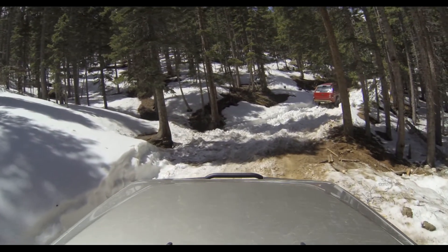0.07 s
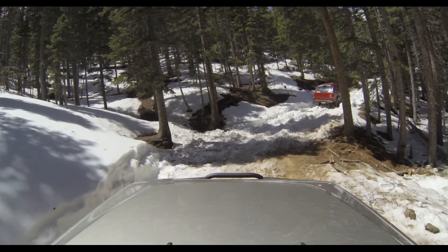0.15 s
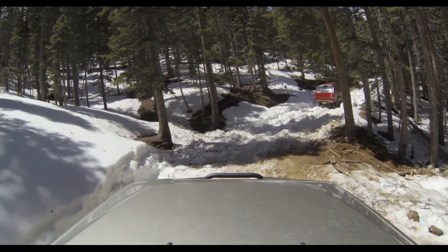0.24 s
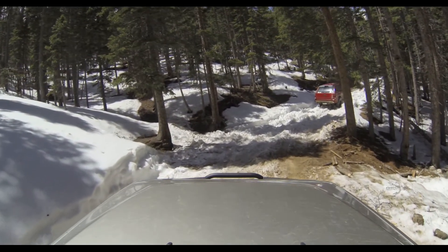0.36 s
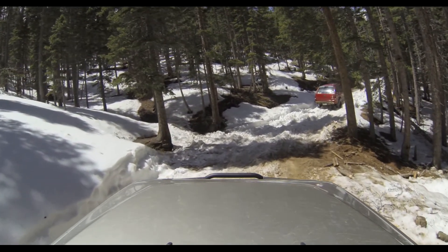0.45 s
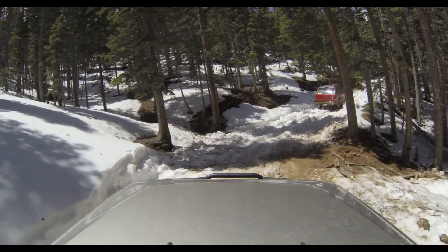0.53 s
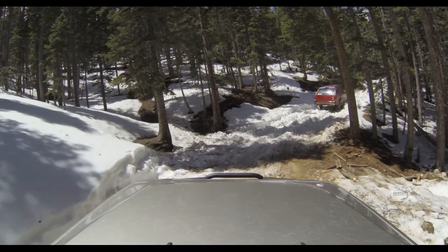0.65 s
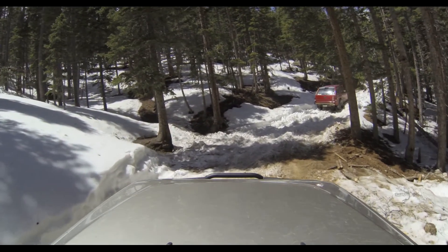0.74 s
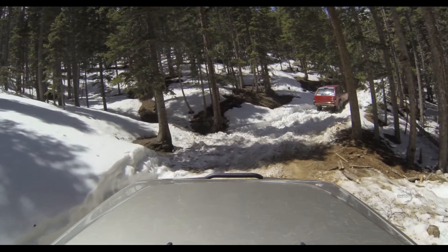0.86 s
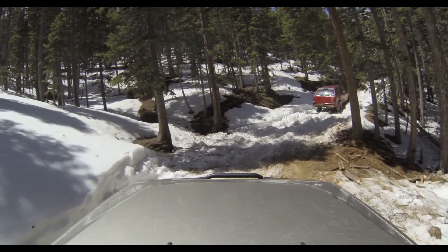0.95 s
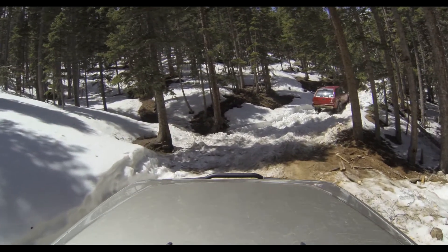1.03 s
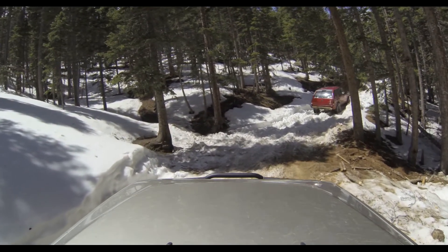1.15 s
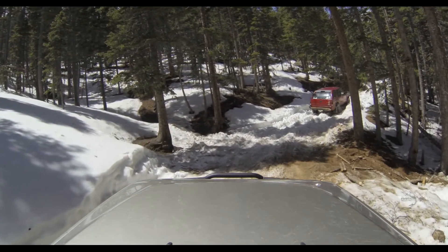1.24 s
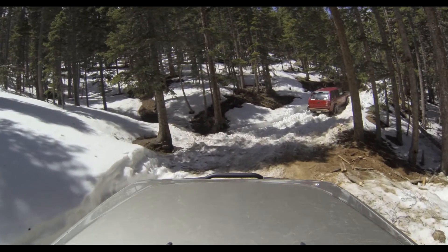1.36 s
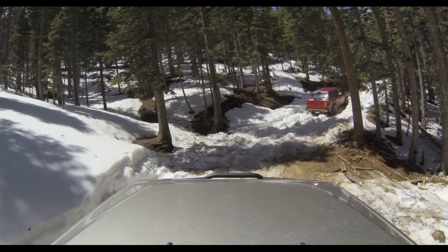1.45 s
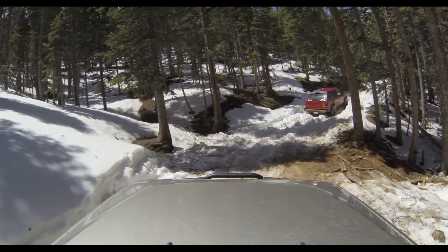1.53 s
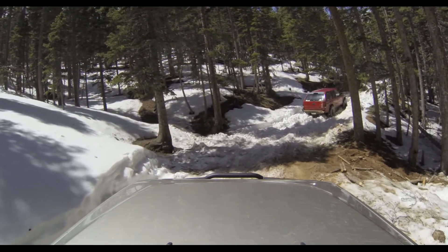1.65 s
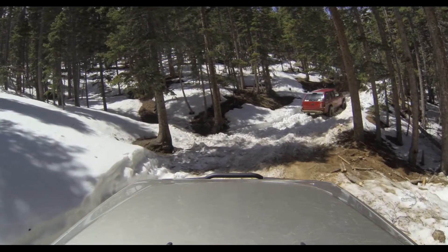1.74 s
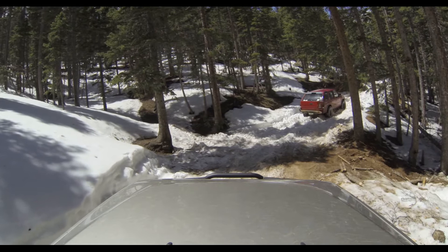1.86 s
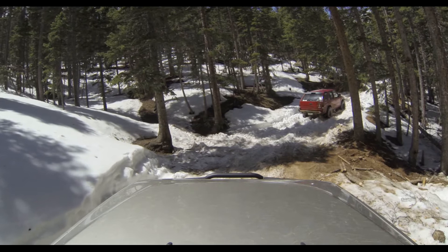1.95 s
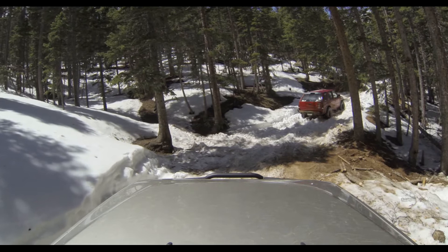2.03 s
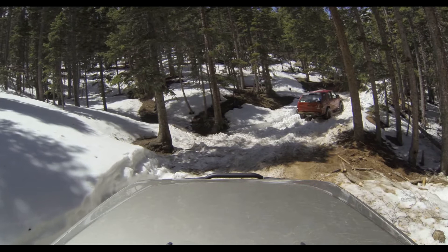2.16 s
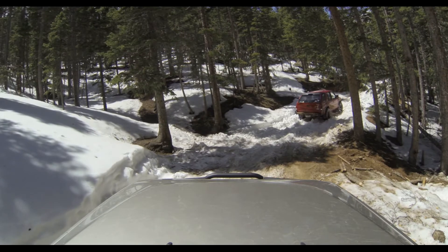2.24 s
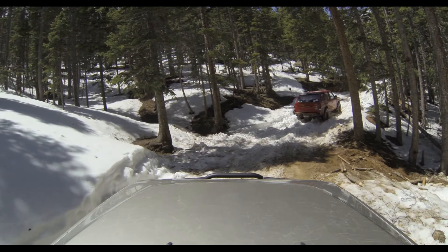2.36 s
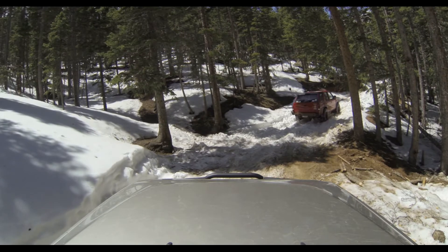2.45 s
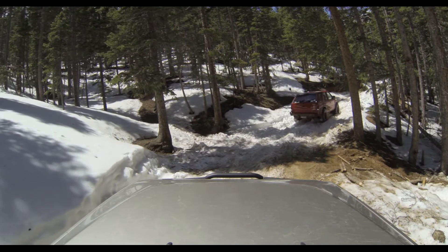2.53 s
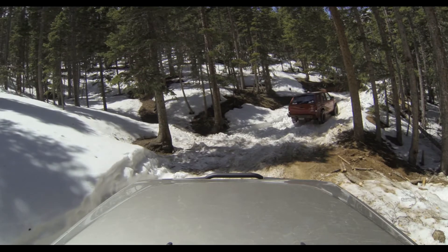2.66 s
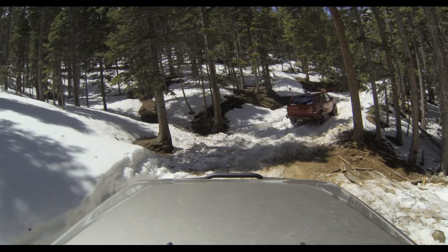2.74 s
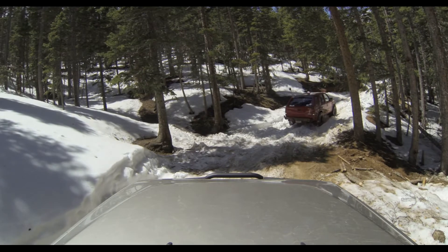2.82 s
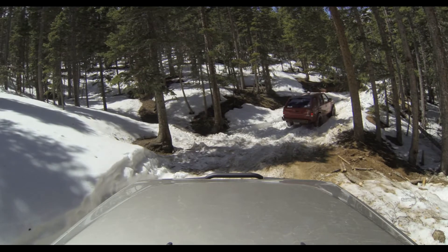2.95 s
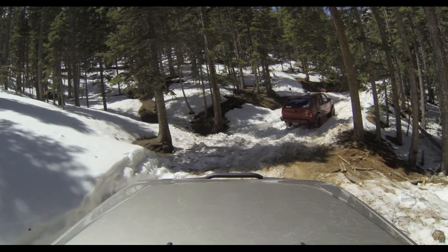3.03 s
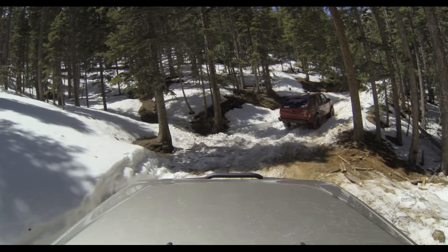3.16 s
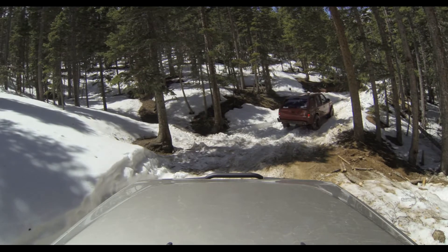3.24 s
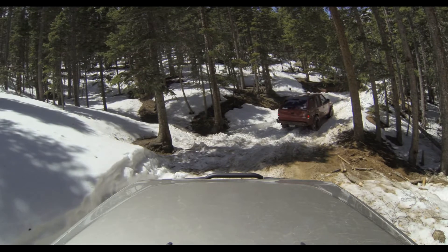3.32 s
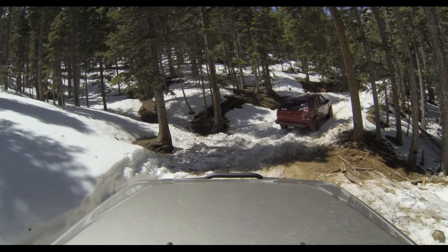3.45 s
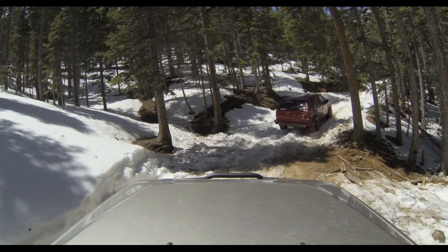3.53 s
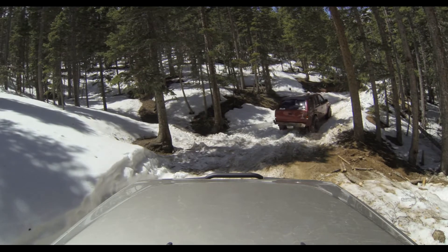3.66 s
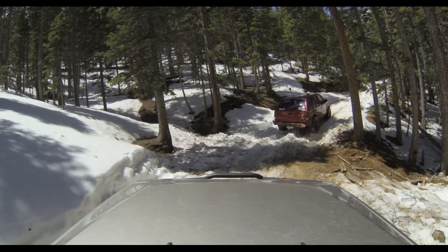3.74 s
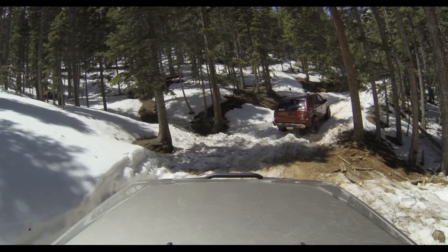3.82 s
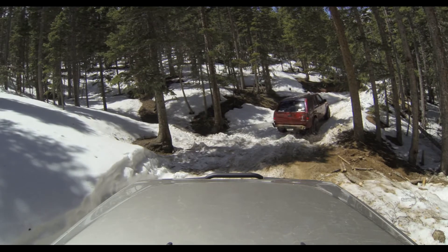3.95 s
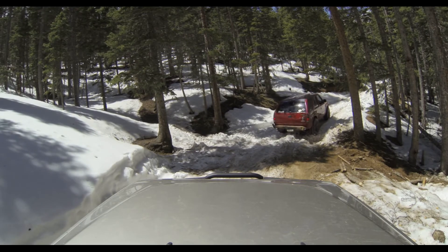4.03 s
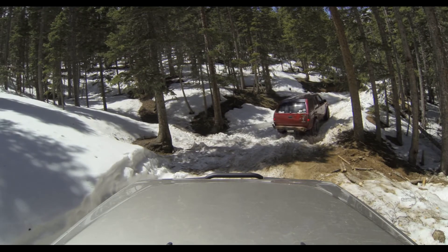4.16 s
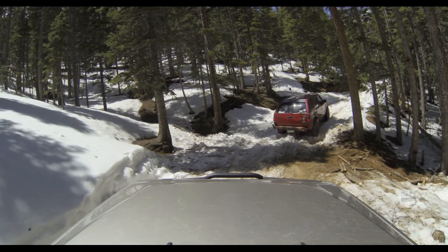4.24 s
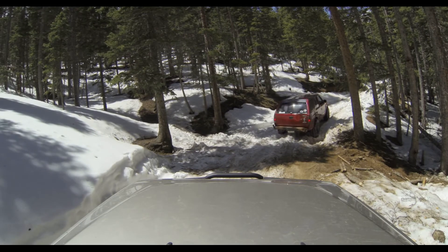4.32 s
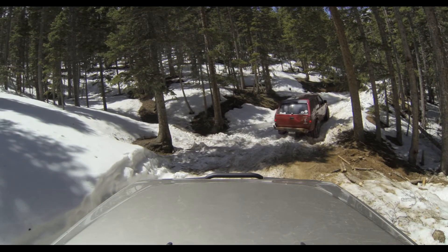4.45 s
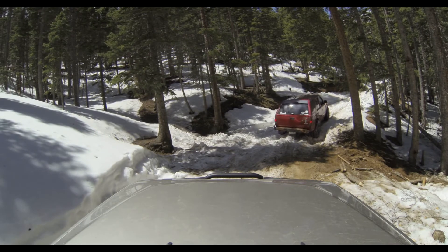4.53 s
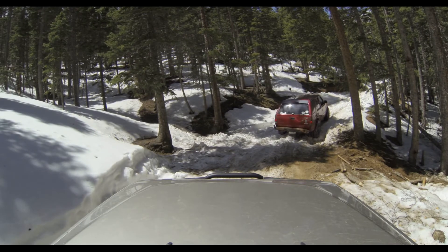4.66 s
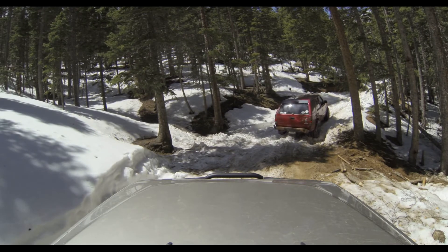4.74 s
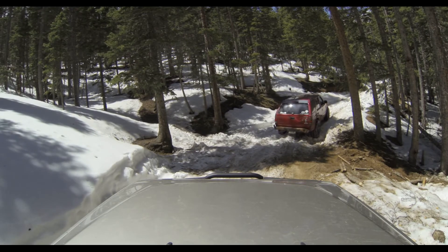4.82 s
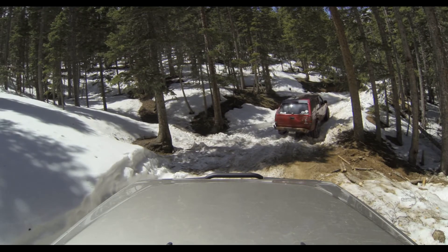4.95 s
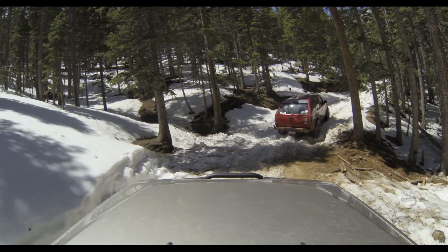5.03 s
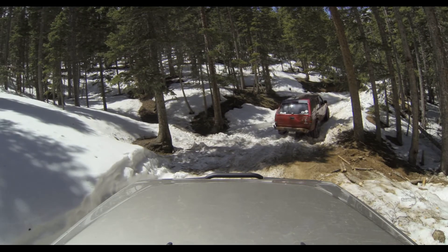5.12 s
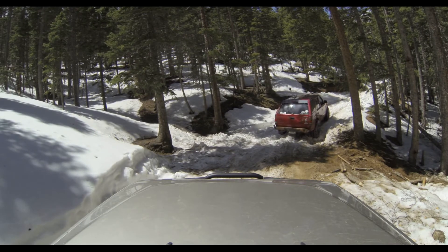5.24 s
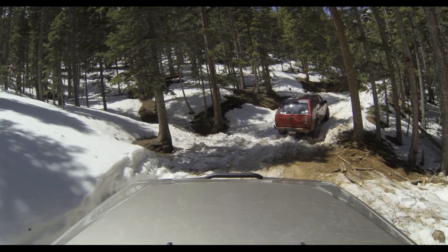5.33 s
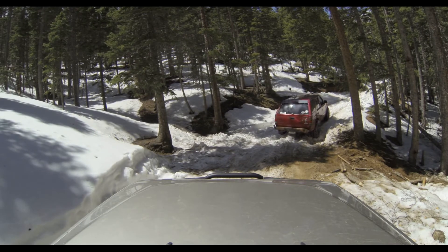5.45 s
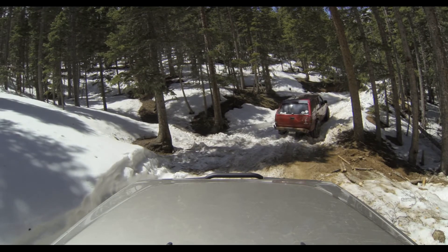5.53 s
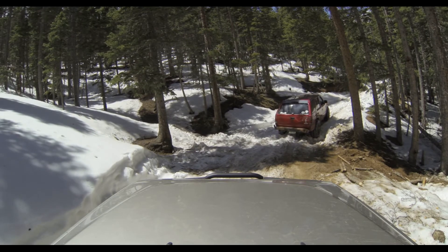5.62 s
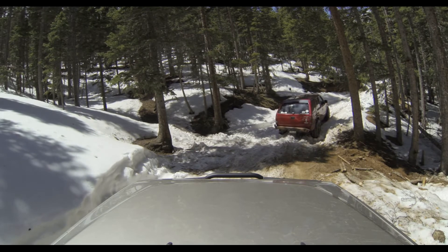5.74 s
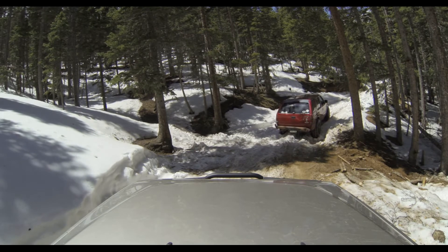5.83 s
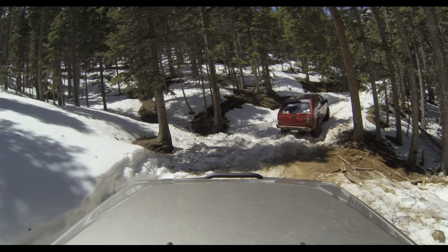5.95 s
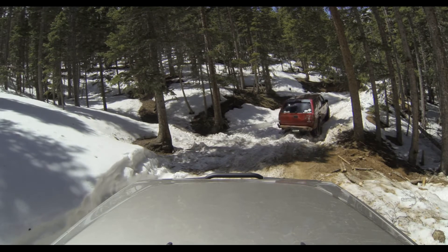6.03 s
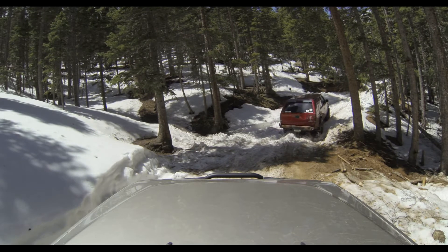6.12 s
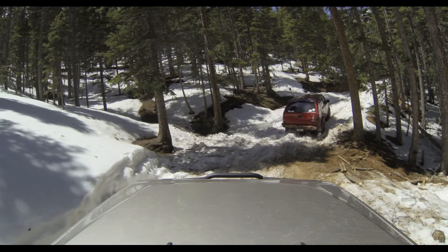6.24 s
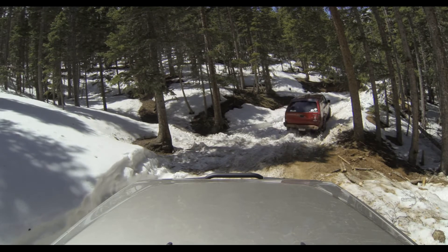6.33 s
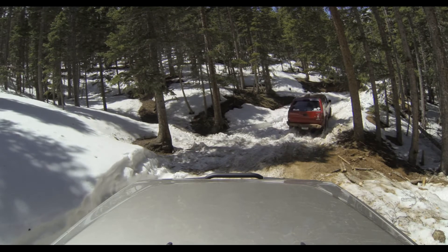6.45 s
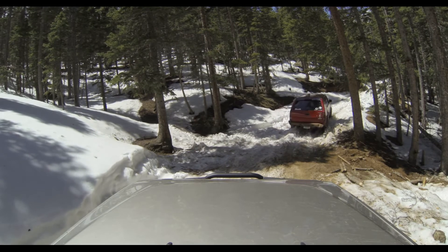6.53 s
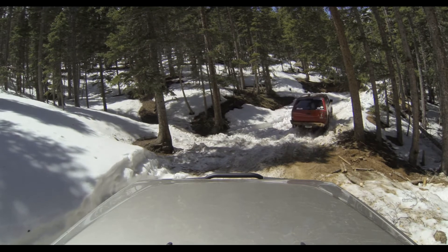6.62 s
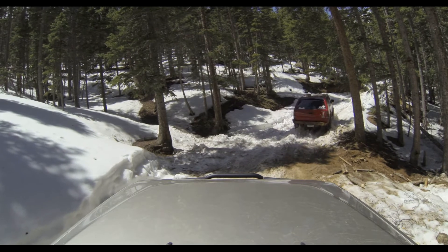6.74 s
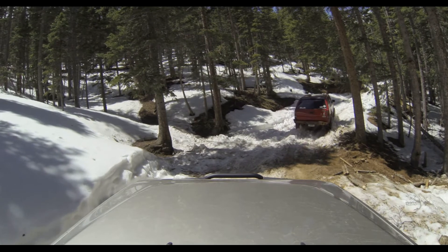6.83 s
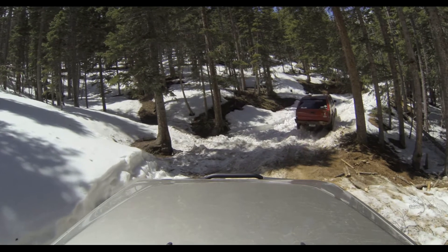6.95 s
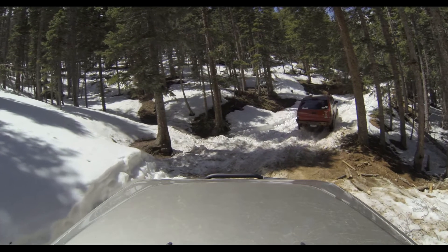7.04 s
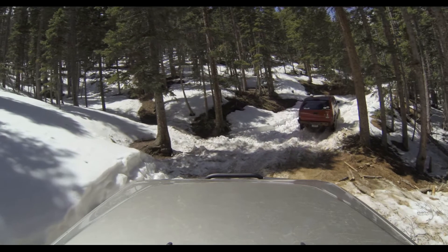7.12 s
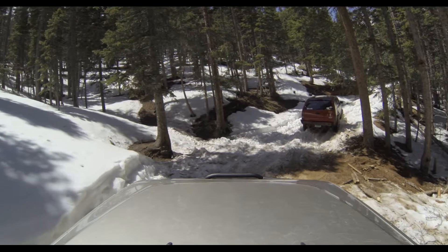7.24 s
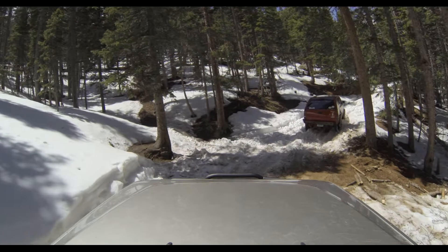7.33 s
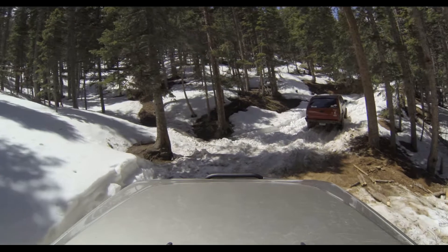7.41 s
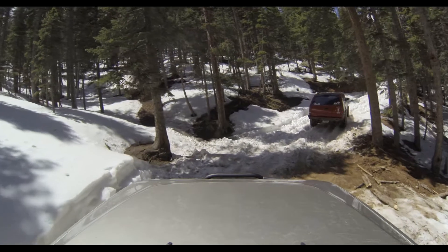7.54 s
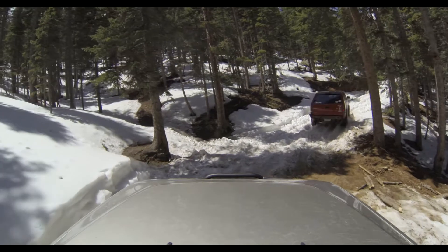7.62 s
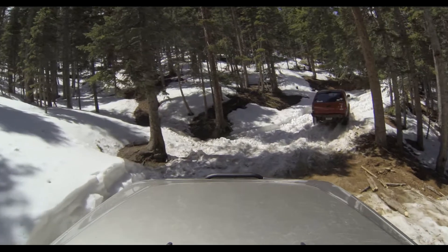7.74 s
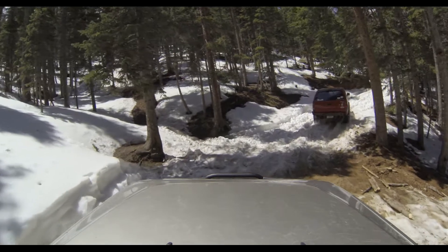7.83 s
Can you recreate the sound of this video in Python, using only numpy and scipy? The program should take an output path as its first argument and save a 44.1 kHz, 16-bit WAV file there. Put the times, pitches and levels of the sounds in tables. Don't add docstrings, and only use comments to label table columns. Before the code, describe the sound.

Close, muffled six-cylinder growl rises and falls on a snowy forest trail, sputters down to idle, then surges and keeps climbing.

```python
import sys
import numpy as np
from scipy import signal
from scipy.fft import rfft, irfft
from scipy.io import wavfile
from scipy.ndimage import uniform_filter1d

SR = 44100
rng = np.random.default_rng(int(sys.argv[2]) if len(sys.argv) > 2 else 0)


def store_pcm(level_fs):
    pcm = np.round(np.clip(level_fs, -1, 1) * 32767).astype(np.int16)
    wavfile.write(sys.argv[1], SR, np.atleast_2d(pcm).T)


def voltage_ratio(decibels):
    exponent = np.asarray(decibels, float) / 20
    return 10 ** exponent


N = 347508
STEP = 40

# time in seconds, firing rate of one bank in Hz.
SPEED = [(0, 84.9), (.16, 82.45), (.48, 89.5), (.62, 85.9), (1.0, 61.4), (1.61, 64.75), (2.1, 73.36),
         (2.21, 71.4), (2.7, 48.59), (3.1, 39.44), (3.74, 30.05), (4.6, 21.8), (5.11, 20.68), (5.65, 50.68),
         (6.75, 70.84), (7.32, 85.9), (7.56, 86.6), (7.88, 87.8)]
FLYWHEEL_S = 0.071
BLIP_S, BLIP_WIDTH_S, BLIP_HZ, BLIP_DB = 2.87, .065, 11, 2
# time in seconds, exhaust load in dB, tailpipe bark towards the microphone in dB.
THROTTLE = [(0, -3.5, -6.5), (.17, -2, -2.5), (.3, 1.5, -4.5), (.5, 0.5, -13.5), (.7, -4, -20.5),
            (.88, -17, -17), (1.15, -0.5, -9.5), (1.62, 2, -6.5), (2.0, -0.5, -0.5), (2.16, -5, -8),
            (2.27, -8, -14.5), (3.3, -14, -11), (5.11, -23, -14), (5.16, -2, 0), (5.9, 2, -2),
            (6.6, -4.5, -5), (6.88, -0.5, 6.5), (7.88, 1, -4)]
# time in seconds, level in dB.
EFFORT = [(0, -1), (.2, 1.5), (.29, 3.5), (.52, -4.5), (.68, -7.5), (1.29, 0.5), (1.73, -1), (1.97, 4),
          (2.24, -1), (3.3, -5.5), (4.6, -6.5), (5.0, -7.5), (5.17, -6), (5.22, 1.5), (5.42, -2.5),
          (5.93, 0.5), (7.25, 2.5), (7.5, -4)]

# level at full load in dB, share of load followed, share of bark followed.
BANK_ORDERS = [(-17.5, 0.21, 0.22), (-12, 1.06, 0.011), (-21, 0.31, 0.46), (-18, 0.45, 0.72)]
# frequency in Hz, gain in dB.
BOOM = [(22, -17), (40, -10), (55, -15), (63, -17.5), (70, 0.5), (73, -6), (78, 1), (88, -0.5)]
# frequency in Hz, gain in dB.
MANIFOLD = [(45, 0), (108, -1), (135, -1.5), (168, 2), (220, -3), (250, -8), (275, -21.5), (340, -8)]
# frequency in Hz, gain in dB.
BANK_PIPE = [(65, 1), (108, 3), (135, -4), (153, -13), (178, 6), (205, -1), (260, -4)]
# frequency in Hz, gain in dB.
SILENCER = [(100, -4), (165, 8.5), (210, 2), (270, -8.5), (340, -1.5), (390, -13), (435, -17), (500, -28.5),
            (650, -37)]
# time in seconds, level in dB.
BANK_DIFFERENCE = [(0, -1.5), (3.1, 9), (3.35, -29.5), (4.4, -4.5), (4.7, -5), (7.88, 8)]
UPPER_DB, UPPER_FOLLOWS = -26, 1
# frequency in Hz, gain in dB.
UNEVEN = [(25, -14), (60, -3), (100, 0), (240, -1), (330, -4), (450, -10), (560, -22), (900, -40)]
UNEVEN_DB, UNEVEN_FOLLOWS = -31.5, 0.77
EVENS_DB_PER_HZ, EVENS_FROM_HZ = 0.6, 69.8
# frequency in Hz, gain in dB.
TAILPIPE = [(480, -35), (570, -33.5), (615, -1), (700, -7), (740, -11.5), (785, -6), (870, -19),
            (920, -24.5), (1020, -17.5), (1100, -21.5), (1300, -36)]
RASP_DB, RASP_FOLLOWS, RASP_BARKS, RASP_LOADS = -38, .5, 0.11, .7
RASP_DB_PER_HZ, RASP_FROM_HZ = 0.6346, 74.3
FIRING_RASP_DB, BANK_RASP_DB, BETWEEN_RASP_DB = 0, -3, -10

# frequency in Hz, density in dB per Hz.
BURBLE = [(18, -35.5), (30, -21), (52, -7.5), (70, 4.5), (108, 6.5), (134, -6), (165, 3.5), (199, -7),
          (305, -9.5), (433, -48), (768, -42.5), (1000, -59.5), (1300, -75.5), (2200, -120)]
BURBLE_DB = -38
# start in seconds, length in seconds, peak in dB, fade in dB per second.
MISFIRES = [
    (.7, 0.31, -45, 5),
    (2.22, .36, -22, 3),
    (2.6, 0.603, -19.5, 5.5),
    (3.2, 1.85, -29.5, 1.5),
    (5.125, .45, -22.5, 18),
]

# frequency in Hz, density in dB per Hz.
CLATTER = [(190, -26), (330, 1.5), (563, -9.5), (800, -16.5), (1050, -18.5), (1430, -20), (1890, -23),
           (2110, -27), (2660, -29), (3350, -33.5), (6000, -51), (7800, -83), (13200, -120)]
CLATTER_DB, CLATTER_FOLLOWS = -36.5, 0.97
# frequency in Hz, width in Hz, gain in dB.
BODY = [(1300, 130, 5), (1480, 160, 7), (1680, 130, 5), (2130, 180, 7), (3300, 350, 6)]
# frequency in Hz, width in Hz.
PANELS = [
    (790, 110),
    (2780, 1100),
]
FLOOR_PAN_DB, FLOOR_PAN_FOLLOWS, SHIELD_REST_DB = -47.5, 0.75, -65
PAN_SHAKEN = 0.29
# start in seconds, length in seconds, peak in dB, fade in dB per second.
SHIELD = [
    (.12, .44, -53, 6.5),
    (1.0, 1.25, -57.5, -5),
]
SPELL_EDGE_S = .03

# time in seconds, firing rate in Hz, level in dB.
IDLE = [(0, 62.19, -29), (.3, 53.84, -21.5), (.7, 49.01, -28.5), (1.3, 46.65, -18.5), (2.7, 45.47, -22),
        (5.1, 45, -25.5), (5.6, 45.45, -33.5), (6.3, 46.13, -24), (6.66, 57.1, -14), (6.78, 51.1, -27),
        (7.88, 52.2, -32)]

# time in seconds, level in dB.
WHEELS = [(0, -58.5), (.75, -58.5), (1.3, -52.5), (2.05, -49.5), (3.4, -52.5), (4.35, -57.5), (4.95, -62.5),
          (5.7, -61.5), (6.7, -55), (7.88, -56.5)]
# frequency in Hz, density in dB per Hz.
CRUNCH = [(1470, -30), (2500, -6.5), (3050, 0.5), (3660, -4), (5200, -8.5), (5830, -10), (6850, -10),
          (7680, -11.5), (10400, -18.5), (14000, -28.5), (15500, -53)]
# frequency in Hz, width in Hz, gain in dB.
HOUSING = [(3300, 400, 3), (4300, 400, 2), (5750, 500, 5), (8850, 350, 5), (10200, 600, 5)]
# time in seconds, centre in Hz, level above the crunch in dB.
TREAD = [(0, 7100, -17), (1, 7200, -3), (1.8, 7350, 0), (3, 7550, 5), (3.8, 7850, 9), (4.5, 8050, -3),
         (4.7, 8000, -8), (6.5, 7600, -2.5), (7.88, 7600, -12)]
# time in seconds, peak in dB, frequency in Hz.
SQUEAKS = [(3.7395, -45, 7390), (4.3618, -50, 7820), (4.4588, -52, 8160), (4.6797, -62, 9030),
           (4.8505, -71, 6485)]


def exhaust(cycle, bank_hz, bank_dbs, uneven_db, upper_db, rasp_db, count=42):
    out = np.zeros(N)
    banks_db = in_time(BANK_DIFFERENCE)[0][::STEP]
    jitter = .006 * sparse_drift(5)
    for k in range(1, count + 1):
        hz = bank_hz * k / 3
        rasp = voltage_ratio(rasp_db + at_hz(TAILPIPE, hz))
        lag = 0.01805 * k * k
        if k % 3 == 0 and k <= 12:
            gain = voltage_ratio(bank_dbs[k // 3 - 1] + .4 * sparse_drift(6))
        elif k % 3 == 0:
            order_db = upper_db - 1.8 * max(k - 17, 0) + k % 2 * banks_db
            rasp_share_db = BANK_RASP_DB if k % 2 else FIRING_RASP_DB
            gain = voltage_ratio(order_db + at_hz(SILENCER, hz)) + voltage_ratio(rasp_share_db) * rasp
            gain = gain * voltage_ratio(2.5 * sparse_drift(4))
        else:
            pattern_db = 3 if k % 3 == 2 else -3
            pattern_db -= 2.1 * max(k - 11, 0)
            gain = voltage_ratio(uneven_db + pattern_db + at_hz(UNEVEN, hz)) + voltage_ratio(BETWEEN_RASP_DB) * rasp
            gain = gain * voltage_ratio(2 * sparse_drift(2))
            lag = rng.uniform(0, 2 * np.pi)
        wander = fill(k * jitter + .12 * sparse_drift(3))
        out += np.sqrt(2) * fill(gain) * np.cos(k * cycle - lag + wander)
    return out


def burble(cycle, burble_db):
    fired = np.diff(np.floor(cycle * 6 / (2 * np.pi)), prepend=0) > 0
    puffs = rms_one(fired * rng.standard_normal(N) * voltage_ratio(3.6 * drift(11)))
    turbulence = 1.3 * rng.standard_normal(N)
    return voltage_ratio(burble_db) * colour(puffs + turbulence, BURBLE)


def clatter(cycle, clatter_db):
    rush = rng.standard_normal(N) * firing_gate(cycle, depth=.3)
    ticks = .35 * grains(per_s=400, spread_db=1.5)
    return voltage_ratio(clatter_db + 0.76 * drift(4.5)) * boost(colour(rush + ticks, CLATTER), BODY)


def panels(cycle, levels_db):
    out = 0
    for (hz, width), level_db in zip(PANELS, levels_db):
        shake = rng.standard_normal(N) * firing_gate(cycle, depth=0.39)
        ringing = resonance(resonance(shake, hz, width), hz, width)
        out = out + voltage_ratio(level_db) * rms_one(ringing)
    return out


def idle_engine():
    hz, level_db = in_time(IDLE)
    phase = 2 * np.pi * np.cumsum(hz) / SR + 0.083 * drift(1.9)
    tone = np.cos(phase) + .1 * np.cos(1.5 * phase) + .15 * np.cos(2 * phase)
    return np.sqrt(2) * voltage_ratio(level_db + 2.0 * drift(6.2)) * tone


def snow(crunch_db):
    clumps = .45 * grains(per_s=1500, spread_db=3) * voltage_ratio(2 * drift(10))
    crunch = boost(colour(rng.standard_normal(N) + clumps, CRUNCH), HOUSING)
    tread, tread_db = singing_tread()
    tread = voltage_ratio(tread_db - 17 + 1.8 * drift(4)) * tread
    return voltage_ratio(crunch_db + 0.92 * drift(25)) * (crunch + tread) + squeaks()


def singing_tread():
    hz, tread_db = in_time(TREAD)
    low_pass = signal.butter(2, 260, fs=SR, output="sos")
    slow = signal.sosfilt(low_pass, rng.standard_normal((2, N)))
    phase = 2 * np.pi * np.cumsum(hz) / SR
    return rms_one(slow[0] * np.cos(phase) + slow[1] * np.sin(phase)), tread_db


def squeaks():
    t = np.arange(N) / SR
    out = np.zeros(N)
    for s, db, hz in SQUEAKS:
        burst = np.exp(-.5 * ((t - s - .008) / .011) ** 2) * rng.standard_normal(N)
        out += voltage_ratio(db + 4) * resonance(resonance(burst, hz, 700), hz, 700)
    return out


def firing_gate(cycle, depth):
    return 1 + depth * np.cos(6 * cycle) + .6 * depth * np.cos(3 * cycle) + .3 * depth * np.cos(cycle)


def spells(rows, rest_db):
    t = np.arange(N) / SR
    gain = np.zeros(N)
    for s, length, db, fade in rows:
        gain += voltage_ratio(db - fade * (t - s)) * (t >= s) * (t < s + length)
    return 20 * np.log10(smooth(gain, SPELL_EDGE_S) + voltage_ratio(rest_db))


def grains(per_s, spread_db):
    sizes = voltage_ratio(spread_db * np.minimum(rng.exponential(1, N), 5)) * rng.choice([-1, 1], N)
    return rms_one(sizes * (rng.random(N) < per_s / SR))


def resonance(x, hz, width):
    r = np.exp(-np.pi * width / SR)
    poles = [1, -2 * r * np.cos(2 * np.pi * hz / SR), r * r]
    return signal.lfilter([(1 - r * r) / 2, 0, (r * r - 1) / 2], poles, x)


def boost(x, peaks):
    return rms_one(x + sum((voltage_ratio(db) - 1) * resonance(x, hz, width) for hz, width, db in peaks))


def colour(x, spectrum):
    hz = np.maximum(np.arange(N // 2 + 1) * SR / N, 1)
    return rms_one(irfft(rfft(x) * voltage_ratio(at_hz(spectrum, hz)), N))


def at_hz(points, hz):
    point_hz, db = np.transpose(points)
    return np.interp(np.log(hz), np.log(point_hz), db)


def in_time(rows):
    s, *columns = np.transpose(rows)
    return [np.interp(np.arange(N) / SR, s, c) for c in columns]


def smooth(x, seconds):
    return uniform_filter1d(x, size=int(seconds * SR), mode="nearest")


def rms_one(x):
    return x / np.sqrt(np.mean(x ** 2) + 1e-20)


def sparse_drift(rate):
    r = np.exp(-2 * np.pi * STEP * rate / SR)
    slow = signal.lfilter([1], [1, -2 * r, r * r], rng.standard_normal(N // STEP + 2002))
    return rms_one(slow[2000:])[:len(range(0, N, STEP))]


def fill(sparse):
    return np.interp(np.arange(N) / STEP, np.arange(len(sparse)), sparse)


def drift(rate):
    return fill(sparse_drift(rate))


def scene():
    blip = np.exp(-.5 * ((np.arange(N) / SR - BLIP_S) / BLIP_WIDTH_S) ** 2)
    bank_hz = smooth(in_time(SPEED)[0], FLYWHEEL_S) + BLIP_HZ * blip
    cycle = 2 * np.pi * np.cumsum(bank_hz / 3) / SR
    load_db, bark_db, effort_db = in_time(THROTTLE) + in_time(EFFORT) + BLIP_DB * blip

    bank_dbs = []
    paths = [BOOM, MANIFOLD, BANK_PIPE, MANIFOLD]
    for k, (db, loads, barks) in enumerate(BANK_ORDERS):
        path_db = at_hz(paths[k], (k + 1) * bank_hz)
        bank_dbs.append(db + loads * load_db + barks * bark_db + path_db)
    evened_db = EVENS_DB_PER_HZ * np.maximum(bank_hz - EVENS_FROM_HZ, 0)
    uneven_db = UNEVEN_DB + UNEVEN_FOLLOWS * load_db - evened_db
    upper_db = UPPER_DB + UPPER_FOLLOWS * bark_db
    rasp_db = RASP_DB + RASP_FOLLOWS * effort_db + RASP_BARKS * bark_db + RASP_LOADS * load_db
    rasp_db = rasp_db + RASP_DB_PER_HZ * (bank_hz - RASP_FROM_HZ)
    controls = [np.array(c)[..., ::STEP] for c in (bank_hz, bank_dbs, uneven_db, upper_db, rasp_db)]

    burble_db = spells(MISFIRES, BURBLE_DB)
    engine = exhaust(cycle, *controls) + burble(cycle, burble_db)
    bay = clatter(cycle, CLATTER_DB + CLATTER_FOLLOWS * effort_db)
    pan_db = FLOOR_PAN_DB + FLOOR_PAN_FOLLOWS * bark_db + PAN_SHAKEN * (burble_db - BURBLE_DB)
    metal = panels(cycle, [pan_db, spells(SHIELD, SHIELD_REST_DB)])
    mix = engine + bay + metal + idle_engine() + snow(*in_time(WHEELS))
    return mix[None]


def band_limit(x):
    return signal.sosfilt(signal.butter(12, 15710, fs=SR, output="sos"), x)


def record(dry):
    bass_cut = signal.butter(2, 34, "high", fs=SR, output="sos")
    cut = signal.sosfilt(bass_cut, dry)
    rounded = cut / (1 + cut ** 8) ** (1 / 8)
    return band_limit(rounded)


dry = scene()
out = record(dry)
store_pcm(out)
```